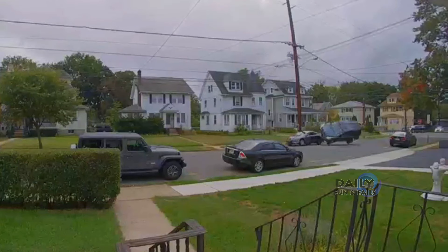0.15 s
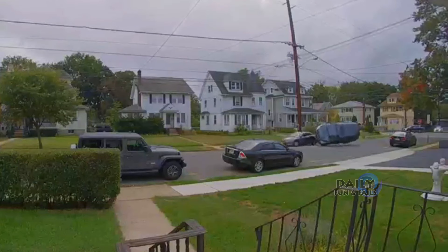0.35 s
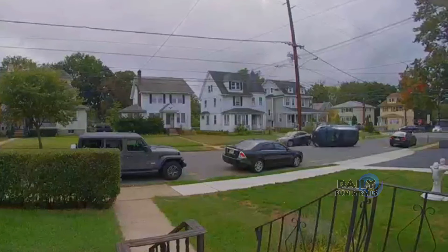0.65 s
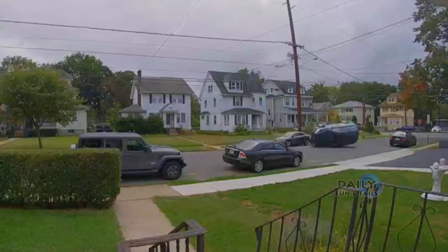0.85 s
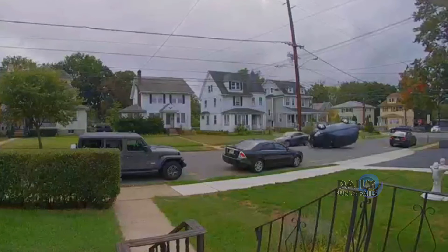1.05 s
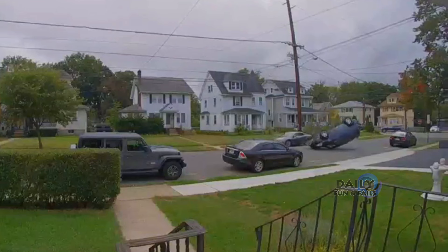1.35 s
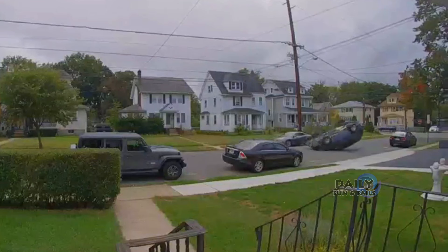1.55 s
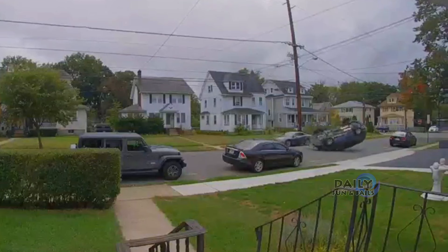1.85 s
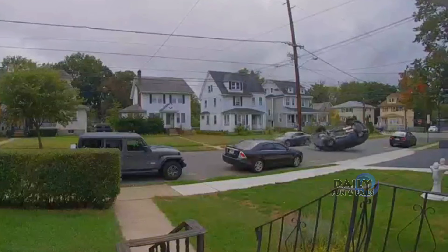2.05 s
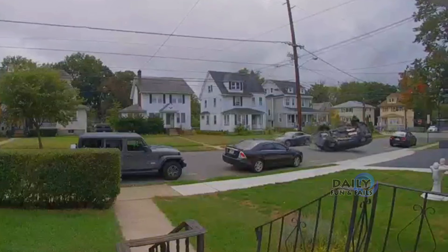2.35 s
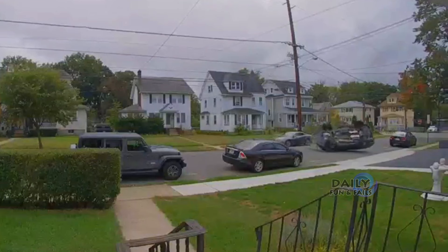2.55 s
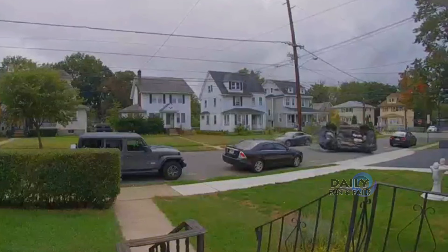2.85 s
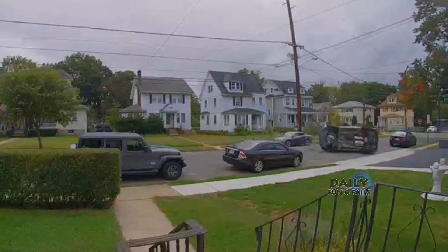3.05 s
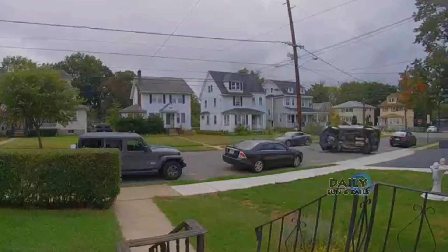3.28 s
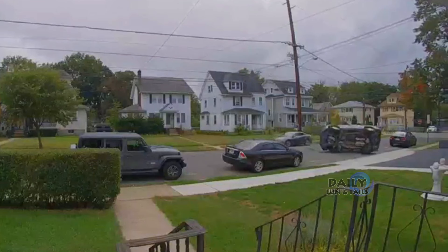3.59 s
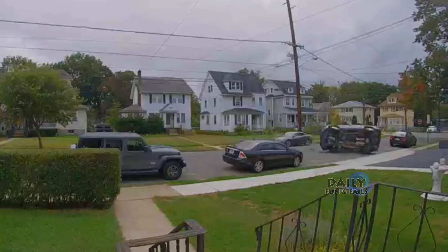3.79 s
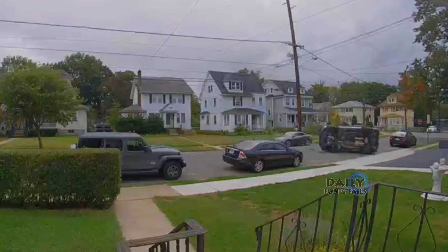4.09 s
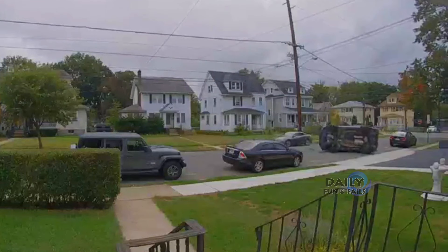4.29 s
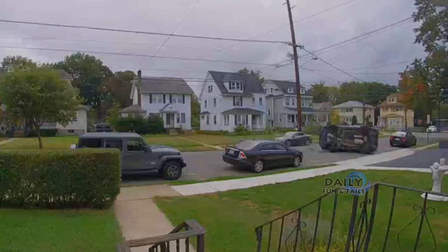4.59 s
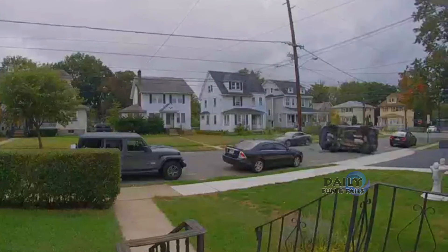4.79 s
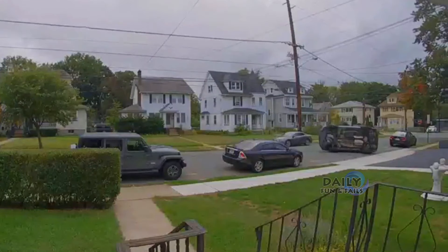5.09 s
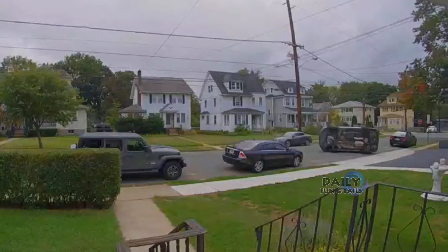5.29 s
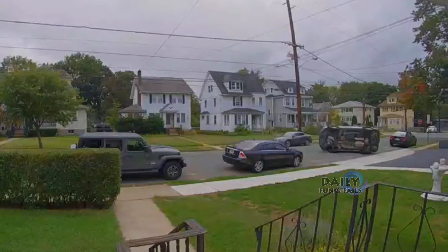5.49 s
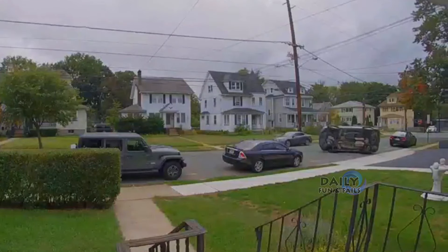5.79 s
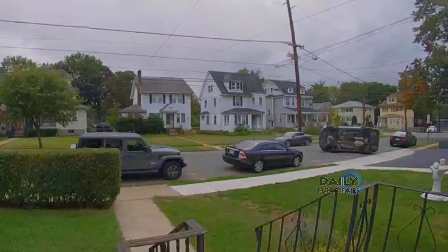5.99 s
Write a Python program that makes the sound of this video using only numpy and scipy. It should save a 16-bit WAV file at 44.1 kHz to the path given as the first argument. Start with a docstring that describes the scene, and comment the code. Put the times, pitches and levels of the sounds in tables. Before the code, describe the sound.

Violent rollover crash outdoors: dense metallic crunches, low body thuds and glassy debris, then brief lulls, scattered knocks and a last small crack.

```python
"""A car rolls over on a street for about six seconds, above a steady outdoor hush with a low rumble.
From the start its body bears on the road: tiny breaks make panels boom, metal crumple and glass grind,
loose bits ring, and a faint scattered echo follows. Soon big panels thud as low tones with sagging pitch,
and twisted metal squeaks on short sliding notes. Then parts snap as bursts of ringing noise.
Around 3.5 and 5 seconds the blows thin out; a last crack and thud come just before the end."""
import sys
import numpy as np
from scipy import signal
from scipy.fft import rfft, irfft, next_fast_len
from scipy.io import wavfile
from scipy.ndimage import uniform_filter1d, minimum_filter1d, map_coordinates

SR = 44100
rng = np.random.default_rng(int(sys.argv[2]) if len(sys.argv) > 2 else 0)


def digitize_waveform(pressure):
    """Quantize a signal to 16-bit integers and store it at the path in sys.argv[1].

    Rows of a 2-D input are taken as channels; values are limited to [-1, 1].
    """
    field = np.atleast_2d(pressure).T
    bounded = np.clip(field, -1, 1)
    quanta = np.round(bounded * 32767).astype(np.int16)
    wavfile.write(sys.argv[1], SR, quanta)


N = 270550  # length in samples

# In the tables, t60_s is the time to fade by 60 dB. Colours give relative levels along frequency.

# Outdoor hush: tone_hz, level_db
STREET_COLOUR = [(15, -49.5), (25, -14.5), (59, -19.5), (101, 3.5), (276, 7.5), (349, -14.5), (411, 0.5),
                 (952, -9), (1070, -0.5), (1350, -4.5), (1960, -7), (2990, -11), (6700, -14), (7200, -41),
                 (14500, -120)]
STREET_DB = -41  # average level of the hush

# The car body on the road: full_load_s, rise_s, hold_s, release_t60_s, metal_crunch_db, panel_boom_db,
# frame_groan_db, glass_grit_db, sheet_resonance_hz
ROAD_CONTACTS = [(0.003, 0.069, .013, .55, -23, -14.5, -24.5, -21, 1200),
                 (0.281, .076, 0.014, 0.66, -31.5, -29, -40, -40.5, 1400),
                 (0.513, 0.089, 0.048, 0.21, -24, -18.5, -20, -42.5, 1250),
                 (0.589, 0.028, 0.054, .25, -19.5, -14.5, -20, -21, 1150),
                 (0.675, .07, 0.026, 0.31, -12, -15, -19.5, -21.5, 1650),
                 (0.709, 0.05, 0.034, 0.52, -23, -19, -20, -22.5, 2210),
                 (0.935, 0.12, 0.1, 0.27, -22.5, -22, -27, -28, 1240),
                 (1.062, 0.056, .045, 0.39, -21, -21, -25, -27.5, 1500),
                 (1.179, 0.03, 0.027, 0.13, -36, -22.5, -32.5, -26.5, 2200),
                 (1.424, 0.039, .07, 0.16, -15, -17.5, -19, -15.5, 1480),
                 (1.515, .03, 0.084, 0.2, -15.5, -15.5, -17.5, -13, 1100),
                 (1.629, .03, .02, .3, -32.5, -31.5, -33, -25.5, 1900),
                 (1.739, 0.049, 0.0092, 0.85, -50, -42.5, -46, -39, 1390),
                 (2.161, 0.044, 0.088, 0.25, -41, -30, -37, -59, 1110),
                 (2.29, .005, 0.0041, .15, -26, -18.5, -19.5, -25.5, 1900),
                 (2.361, 0.046, 0.097, .15, -74, -26.5, -42, -68, 1200),
                 (2.5, .0092, 0.038, .3, -23.5, -19.5, -26, -25, 1200),
                 (2.692, 0.17, 0.045, 0.2, -27, -32, -38.5, -31, 1500),
                 (2.82, 0.029, 0.033, 0.21, -18, -11, -22.5, -25.5, 1920),
                 (2.992, 0.061, 0.1, 0.16, -44, -28, -34, -59, 1300),
                 (3.141, .068, 0.046, 0.31, -19, -14, -19.5, -21, 1517),
                 (3.353, .028, 0.011, 0.05, -33, -45, -50, -28, 1700),
                 (3.469, .05, 0.47, .3, -63, -43.5, -60, -54.5, 1500),
                 (3.93, 0.037, .072, 0.22, -29, -21.5, -32, -34, 1650),
                 (4.028, .02, 0.074, 0.41, -20.5, -19.5, -21.5, -19, 2200),
                 (4.13, .06, 0.082, 0.57, -20, -20.5, -21.5, -28.5, 2230),
                 (5.322, 0.057, 0.092, .16, -26.5, -33, -25, -54.5, 2100),
                 (5.416, 0.045, 0.051, .085, -16, -25, -27.5, -19.5, 1800),
                 (5.497, .008, .012, .21, -22, -21, -26, -18.5, 1800),
                 (5.921, .027, .2, 0.5, -49, -25.5, -38.5, -45, 1190)]
RISE_DB = 20  # gained over the rise time as the weight comes on
BOOM_LINGERS, GRIT_LINGERS = 1.17, 0.85  # their release time over that of the crunch
LURCH_DB, LURCH_PER_S = 0.05, 39  # the load shifts while the wreck slides
# Resonances of the body shell: centre_hz, width_hz, level_db
SHELL_MODES = [(234, 52, 0.5)]
# Colours of panel boom, frame groan, crumpling metal and ground glass: tone_hz, level_db
BOOM_COLOUR = [(25, -11.5), (70, -15), (105, 6), (200, -2.5), (320, -7.5), (450, -11.5), (900, -50.5)]
GROAN_COLOUR = [(150, -35), (300, 2), (400, -1), (550, 4), (700, 1.5), (850, -3), (1000, -3), (1400, -17.5),
                (3000, -62.5)]
METAL_COLOUR = [(400, -34.5), (800, -22.5), (950, -1.5), (1100, 3.5), (1500, 2.5), (2150, 3.5),
                (2600, -6.5), (3100, -11.5), (4000, -29.5), (8000, -47)]
GLASS_COLOUR = [(1200, -11), (2200, -0.5), (2800, 2), (3700, 3), (4400, -3.5), (5300, -0.5), (6800, -6.5),
                (9000, -12)]
SHEET_DB, SHEET_WIDTH = 5, 0.26  # height and relative width of the crumpling sheet's resonance
BEND, BEND_PER_S = 0.02511, 22  # share and speed of the pitch drift as the metal bends
# Bits of trim and glass that spring off: level and its spread (dB), middle pitch (Hz),
# pitch spread (octaves), ring time t60 (s)
SHARD_DB, SHARD_SPREAD_DB, SHARD_HZ, SHARD_OCTAVES, SHARD_T60_S = -0.5, 4.5, 3270, .7, 0.033

# How long the echo of the house fronts lasts: tone_hz, t60_s
HOUSE_ECHO = [(150, 0.56), (1500, 0.27), (7000, 0.13)]

# Big panels buckling, levels before a common trim: start_s, level_db, pitch_hz, t60_s
PANEL_THUDS = [(0.046, -1.5, 202.5, 0.14), (0.451, -4.5, 164, 0.092), (0.514, -1.5, 267, 0.061),
               (0.604, -2.5, 199, 0.16), (0.64, -3, 293, 0.11), (0.672, -4, 694, 0.067),
               (0.695, -1.5, 320, 0.09), (0.924, -4, 189.4, 0.27), (1.055, -6, 216.7, 0.2),
               (1.127, -4.5, 220, 0.22), (1.172, 4.5, 204, 0.092), (1.382, -2, 183.4, 0.16),
               (2.284, -5, 531, 0.1), (2.294, -4.5, 134, 0.19), (2.361, -13.5, 195, 0.18),
               (2.493, -4.5, 132.7, 0.21), (2.792, -1.5, 238.4, 0.23), (2.839, 1.5, 213.5, 0.16),
               (3.018, -5.5, 281, 0.039), (3.111, -14, 40, 0.11), (3.144, -9, 202, 0.46),
               (3.623, -16.5, 202, 0.054), (4.15, -17.5, 138, 0.14), (4.241, -4, 255.5, 0.1),
               (4.29, -10.5, 188, 0.094), (4.349, -10, 236, 0.12), (4.432, -11, 371, 0.055),
               (4.702, -6, 224, 0.044), (5.257, -10, 210, 0.08), (5.311, -3, 232, 0.04),
               (5.384, -1.5, 232.6, 0.093), (6.067, -10, 585, 0.039)]

# Metal rubbing on metal: middle_s, pitch_hz, level_db, half_length_s, glide_octaves_per_s, pitch_waver_share
METAL_SQUEAKS = [(0.066, 5280, -21.5, .0094, -0.5, .004), (0.228, 1390, -23, 0.016, -1, .02),
                 (0.281, 1400, -31.5, 0.034, 0.5, .02), (0.386, 5200, -34, 0.025, 1, .004),
                 (0.688, 1400, -17, .018, 8.5, .03), (0.986, 1430, -22, 0.012, -4, .01),
                 (2.13, 1960, -24, 0.0092, 1, .02), (3.521, 5175, -34.5, .03, -1.5, .003),
                 (3.635, 3440, -40.5, 0.045, -1, .014), (3.66, 5220, -46.5, 0.049, -1, .008),
                 (3.777, 1960, -44, .05, -0.5, .003), (3.831, 1960, -38, .025, -0.5, .003),
                 (5.421, 2200, -14.5, .013, 0.5, .015), (5.448, 1830, -15.5, 0.023, -15.5, .02),
                 (5.47, 1600, -12.5, 0.012, -3.5, .015)]

# Parts snapping, levels before common trims, clack and edge on top of the overall level:
# break_s, level_db, clack_db, glassy_edge_db, ring_hz, t60_s
PART_CRACKS = [(0.216, -12.5, -30, -36, 1410, 0.1), (0.465, -18, -16, -5.5, 1000, 0.052),
               (0.506, 0.5, -10.5, -18, 1160, 0.13), (0.578, -5, -32, -9, 2270, 0.08),
               (0.587, -6, -36, -3.5, 2400, 0.07), (0.705, -0.5, -17.5, -5.5, 2200, 0.14),
               (0.737, -11, -22.5, -3.5, 2700, 0.05), (1.086, -12.5, -7.5, -20, 1450, 0.046),
               (1.175, -5, -1, -5, 3400, 0.036), (1.205, -5, -21, -2, 3400, 0.07),
               (1.221, -9.5, -23, -3.5, 2250, 0.05), (1.329, 0, -31, -1.5, 3700, 0.031),
               (1.354, -4, -10.5, -12.5, 3430, 0.066), (1.419, -1.5, -23, -5, 1440, 0.048),
               (1.462, 1.5, -22, -10.5, 1830, 0.095), (1.515, -1.5, -11, -20, 1080, 0.095),
               (1.602, -4, -15.5, -2.5, 1500, 0.098), (1.973, -32.5, -12, 7.5, 3640, 0.035),
               (2.063, -17, -13.5, -1.5, 1180, 0.041), (2.115, -4.5, -19, -11.5, 1900, 0.051),
               (2.159, -18, -7.5, -19, 2000, 0.06), (2.213, -20, 0.5, -31, 2000, 0.032),
               (2.284, 1.5, 0, -19.5, 1900, 0.022), (2.405, -1, -14, -7, 1660, 0.032),
               (2.494, 4, -8.5, -10.5, 1210, 0.053), (2.521, 6.5, -22.5, -10, 1310, 0.044),
               (2.547, 8, -28, -15, 1150, 0.039), (2.636, -5.5, -10, -11, 3160, 0.06),
               (2.693, -10.5, -11, -12, 1600, 0.055), (2.727, -5.5, -37, -4.5, 3400, 0.041),
               (2.754, -12, -25, -10, 3200, 0.04), (2.819, -1.5, -5, -20, 2040, 0.11),
               (2.85, -2, -11.5, -19, 1900, 0.089), (3.058, -10, -4, -41, 1330, 0.078),
               (3.14, -2.5, -34, -28, 1520, 0.071), (3.257, -10, -25, -5.5, 1880, 0.12),
               (3.914, -18, -19.5, -8, 1400, 0.1), (3.929, -12.5, -17, -6.5, 1600, 0.08),
               (3.947, -12, -19, -8, 2700, 0.066), (3.971, -6.5, -17, -5.5, 1720, 0.087),
               (3.989, -8, -15, -11, 1100, 0.053), (4.021, 2, -19, -10.5, 1680, 0.1),
               (4.112, -8.5, -12, -16, 1200, 0.05), (4.15, -7, -4.5, -18, 2100, 0.05),
               (4.202, -2, -20.5, -23.5, 2180, 0.051), (4.434, -6.5, -4, -16, 2080, 0.12),
               (4.697, -3.5, -6, -8, 1990, 0.059), (5.273, -10.5, -12, -9, 2180, 0.027),
               (5.316, -11, -2.5, -43, 2120, 0.12), (5.49, -4, -25, -2.5, 1800, 0.15),
               (5.914, -14.5, -8.5, -17, 1880, 0.11), (5.96, -25.5, -4.5, -13, 1500, 0.055),
               (6.002, -19.5, -5.5, -8, 1200, 0.08), (6.068, -24, 7.5, 0, 3520, 0.11)]
# Colours of the hollow clack, the snap and the glassy edge: tone_hz, level_db
CLACK_COLOUR = [(90, -11), (250, -4.5), (520, 2.5), (800, -9.5), (1400, -18), (4000, -44)]
SNAP_COLOUR = [(300, -37), (800, -9), (1200, 0.5), (2000, 0), (2700, -7.5), (3600, -7), (5000, -39),
               (8000, -28.5)]
EDGE_COLOUR = [(1500, -73.5), (3000, -7), (3700, -3), (4500, -3.5), (5500, -6), (7000, -2.5), (9000, -10.5)]

# Treble loss of the microphone: tone_hz, level_db
MICROPHONE_RESPONSE = [(6900, -0.5), (7350, -11.5), (7700, -26.5), (9000, -30), (12000, -83.5)]
CLIP_LEVEL = .95  # where the peaks round off
TOP_HZ = 15827  # nothing passes from here up


def amp(db):
    """Turn decibels into gain."""
    return 10 ** (np.asarray(db) / 20)


def unit(x):
    """Scale to an rms (average strength) of 1."""
    return x / np.sqrt(np.mean(x ** 2) + 1e-20)


def along(points, hz):
    """Read (Hz, value) points on a log frequency axis."""
    f, v = np.transpose(points)
    return np.interp(np.log(hz + 1), np.log(f + 1), v)


def fade(t, t60):
    """Exponential decay that loses 60 dB in t60 seconds."""
    return np.exp(-np.log(1000) * t / np.maximum(t60, 1e-3))


def wobble(rate, size):
    """A smooth random curve through `rate` random points a second."""
    points = rng.standard_normal(int(size * rate / SR) + 4)
    return map_coordinates(points, [np.arange(size) * rate / SR])


def filtered(x, response):
    """Multiply the spectrum of x by a response to frequency."""
    m = next_fast_len(len(x) + 8192)
    return irfft(rfft(x, m) * response(np.fft.rfftfreq(m, 1 / SR)), m)[:len(x)]


def coloured(x, response, size=8192):
    """Filter x by the given gain, without pre-ringing; the power of white noise stays the same."""
    # folding the cepstrum forward in time makes the filter answer as early as it can
    cepstrum = irfft(np.log(np.maximum(response(np.fft.rfftfreq(size, 1 / SR)), 1e-6)))
    cepstrum[1:size // 2] *= 2
    cepstrum[size // 2 + 1:] = 0
    ring = irfft(np.exp(rfft(cepstrum)))
    return signal.fftconvolve(x, ring / np.linalg.norm(ring))[:len(x)]


def shaped(x, points):
    """Give x the colour of (Hz, dB) points."""
    return coloured(x, lambda hz: amp(along(points, hz)))


def resonance(hz, centre, width):
    """A bump of height 1 at the centre, its width relative to the centre."""
    return 1 / (1 + ((hz / centre - 1) / width) ** 2)


def steadied(x, seconds):
    """Even out x to a running rms of 1."""
    width = max(int(seconds * SR), 2)
    power = uniform_filter1d(uniform_filter1d(x * x, width), width)
    return x / np.sqrt(np.abs(power) + 1e-9)


def add(track, s, sound):
    """Mix a sound into the track from time s."""
    part = track[max(round(s * SR), 0):][:len(sound)]
    part += sound[:len(part)]


def modal(x, spacing_hz, depth_db, size=4096):
    """Every bent part has its own dense set of modes: random peaks and dips along frequency."""
    def modes(hz):
        peaks = map_coordinates(rng.standard_normal(2048), [hz / max(spacing_hz, 20)], mode="mirror")
        return amp(depth_db * np.tanh(peaks) * hz / (hz + 900))  # shallower in the bass
    return coloured(x, modes, size=size)


def street():
    """Steady outdoor hush with a softly swelling low rumble, both coloured noise."""
    hush = unit(shaped(rng.standard_normal(N), STREET_COLOUR)) * amp(STREET_DB + 0.19 * wobble(3.18, N))
    rumble = shaped(rng.standard_normal(N), BOOM_COLOUR) * amp(-50.5 + 4.5 * wobble(13, N))
    return hush + rumble


def load(t, rise, hold, t60):
    """The weight comes on, bears for a while and lifts off."""
    coming_on = amp(RISE_DB * np.minimum(t, 0) / max(rise, .005))
    return coming_on * fade(np.maximum(t - hold, 0), t60)


def fractures(size, rate, spread_db, even_s):
    """Tiny breaks at random moments and of uneven size; together they release a steady power."""
    happens = rng.random(size) < rate / SR  # rate is breaks per second
    sign = rng.choice([-1, 1], size)
    breaks = happens * sign * amp(spread_db * rng.standard_normal(size))
    return steadied(breaks, even_s)


def shell_gain(f):
    """The boom of the car body with its resonances."""
    modes = 0
    for k, (centre, width, db) in enumerate(SHELL_MODES):
        damping = 1j * f * width
        modes = modes + (-1) ** k * amp(db) * damping / (centre * centre - f * f + damping)
    return amp(along(BOOM_COLOUR, f)) * (0.29 + np.abs(modes))


def bent(x):
    """The resonances of a part slide up and down as it is bent."""
    speed = 1 + BEND * wobble(BEND_PER_S, len(x))
    return map_coordinates(x, [np.cumsum(speed)], mode="mirror")


def shards(size, count=70):
    """Loose bits land at random moments; each rings with three pitches of its own."""
    out = np.zeros(size)
    t = np.arange(SR // 10) / SR
    for at, draw in zip(rng.random(count), rng.standard_normal((count, 4))):
        octaves = SHARD_OCTAVES * np.clip(draw[1:, None], -2, 2)
        hz = np.minimum(SHARD_HZ * 2 ** octaves, SR / 4)
        ring = np.sin(2 * np.pi * hz * t).mean(0) * fade(t, SHARD_T60_S)
        add(out, at * size / SR, amp(SHARD_DB + SHARD_SPREAD_DB * draw[0]) * ring)
    return out


def crushing():
    """Where a part bears on the road, breaks drive the shell, the frame, the sheet metal and the glass."""
    out = np.zeros(N)
    size, lead = 30000, .15  # samples per contact; seconds before full load
    t = np.arange(size) / SR - lead
    for s, rise, hold, t60, crunch_db, boom_db, groan_db, grit_db, sheet_hz in ROAD_CONTACTS:
        bearing = load(t, rise, hold, t60) * amp(LURCH_DB * wobble(LURCH_PER_S, size))
        crunch = amp(crunch_db) * bearing
        groan = amp(groan_db) * bearing
        boom = amp(boom_db) * load(t, rise, hold, t60 * BOOM_LINGERS)
        grit = amp(grit_db) * load(t, rise, hold, t60 * GRIT_LINGERS)

        shell = coloured(fractures(size, rate=500, spread_db=4.5, even_s=0.025), shell_gain)
        buckles = fractures(size, rate=1000, spread_db=1.5, even_s=0.02)  # shared by frame and sheet
        frame = bent(modal(shaped(buckles, GROAN_COLOUR), spacing_hz=51.04, depth_db=12.5))

        def sheet_gain(hz):
            return amp(along(METAL_COLOUR, hz) + SHEET_DB * resonance(hz, sheet_hz, SHEET_WIDTH))

        metal = bent(modal(coloured(buckles, sheet_gain), spacing_hz=55, depth_db=8.5))
        splinters = shaped(fractures(size, rate=1800, spread_db=3.0, even_s=0.03), GLASS_COLOUR)
        glass = modal(splinters, spacing_hz=55, depth_db=12)

        judder = amp(1.1 * wobble(91.0, size))  # the wreck catches and lets go
        scrape = groan * steadied(frame, 0.023)
        scrape += crunch * steadied(metal, 0.013)
        scrape += grit * steadied(glass, 0.025)
        debris = np.sqrt(crunch * grit) * shards(size)
        contact = boom * steadied(shell, 0.045) + judder * scrape + debris
        add(out, max(s - lead, 0), contact[t >= -s])  # cut what would fall before time 0
    return out


def houses(x):
    """A scattered echo from across the street: noise that dies away sooner in the treble."""
    hz, t, z = signal.stft(rng.standard_normal(SR // 2), SR, nperseg=256)
    fading = z * fade(t, along(HOUSE_ECHO, hz)[:, None])
    tail = signal.istft(fading, SR, nperseg=256)[1]
    delayed = np.pad(tail, (SR // 100, 0))  # 10 ms later
    return signal.fftconvolve(x, delayed / np.linalg.norm(tail))[:N]


def thuds(size=13230):
    """A buckling panel swells into a few low cycles whose pitch sags as it gives way."""
    out = np.zeros(N)
    t = np.arange(size) / SR
    for s, db, hz, t60 in PANEL_THUDS:
        pitch = hz * (.96 + 0.11 * np.exp(-t / 0.022) + 0.04 * wobble(90, size))
        phase = 2 * np.pi * np.cumsum(pitch) / SR
        swell = (1 - np.exp(-(t / 0.0056) ** 2)) * fade(t, t60)
        ring = np.sin(phase)
        for ratio, gain in [(.72, 0.28), (1.55, 0.23)]:  # two weaker side tones
            ring += gain * np.sin(ratio * phase + 2 * np.pi * rng.random())
        add(out, s, amp(db - 6.5) * swell / swell.max() * ring)
    return out


def squeaks():
    """Rubbing edges sing briefly on one unsteady, sliding note."""
    out = np.zeros(N)
    t = np.arange(SR // 2) / SR
    centre = t.mean()
    for s, hz, db, half, glide, waver in METAL_SQUEAKS:
        pitch = hz * 2 ** (glide * np.clip(t - centre, -2 * half, 2 * half))
        phase = 2 * np.pi * np.cumsum(pitch * (1 + waver * wobble(500, len(t)))) / SR
        stick_slip = amp(5.6 * wobble(148.7, len(t)))
        swell = 1 / (1 + ((t - centre) / half) ** 2) ** 2.1
        note = amp(db) * stick_slip * np.sin(phase) * swell
        add(out, s - centre, note[max(round((centre - s) * SR), 0):])
    return out


def cracks(size=11025):
    """A soft noisy onset, then a snap with a hollow clack and a glassy edge, ringing in its part."""
    out = np.zeros(N)
    lead, onset_s = .016, .0045  # start before the break; time constant of the onset
    t = np.arange(size) / SR - lead
    after = np.maximum(t, 0)

    def ringing(colour):
        noise = coloured(rng.standard_normal(size), colour)
        return steadied(modal(noise, spacing_hz=125.04, depth_db=14.5), 0.0065)

    for s, db, clack_db, edge_db, ring_hz, t60 in PART_CRACKS:
        onset = amp(-13.5) * np.exp(np.minimum(t, 0) / onset_s)
        give = np.maximum(1 - np.exp(-after / 0.0017), .28)
        rattle = amp(1.03 * wobble(202, size))  # the broken edges strike each other again

        def envelope(life):
            burst = give * rattle * (fade(after, life) + 0.76 * fade(after, 0.029))
            return np.where(t < 0, onset, burst)

        def snap_gain(hz):
            return amp(along(SNAP_COLOUR, hz) + 7 * resonance(hz, ring_hz, 0.14))

        clack = ringing(lambda hz: amp(along(CLACK_COLOUR, hz))) * envelope(t60 * 2.35)
        snap = ringing(snap_gain) * envelope(t60)
        edge = ringing(lambda hz: amp(along(EDGE_COLOUR, hz))) * envelope(t60 * 1.09)
        mix = amp(clack_db - 7.5) * clack + amp(-9.0) * snap + amp(edge_db - 1.5) * edge
        add(out, s - lead, amp(db) * mix)
    return out


def scene():
    """The wreck, its echo and the street."""
    wreck = crushing() + thuds() + squeaks() + cracks()
    return (wreck + amp(-17) * houses(wreck) + street())[None]


def record(dry):
    """A narrow-band microphone, a fast limiter, rounded peaks and the band limit."""
    # the last factor thins the deepest bass, below about 18 Hz
    x = filtered(dry[0], lambda hz: amp(along(MICROPHONE_RESPONSE, hz)) * hz / np.hypot(hz, 18))
    needed = np.minimum(1, 1.12 / (np.abs(x) + 1e-9))  # gain that holds peaks to 1.12
    x = x * uniform_filter1d(minimum_filter1d(needed, size=133), size=133)  # over 3 ms
    x = x / (1 + np.abs(x / CLIP_LEVEL) ** 16) ** (1 / 16)
    return filtered(x, lambda hz: hz < TOP_HZ)[None]


dry = scene()
out = record(dry)
digitize_waveform(out)
```